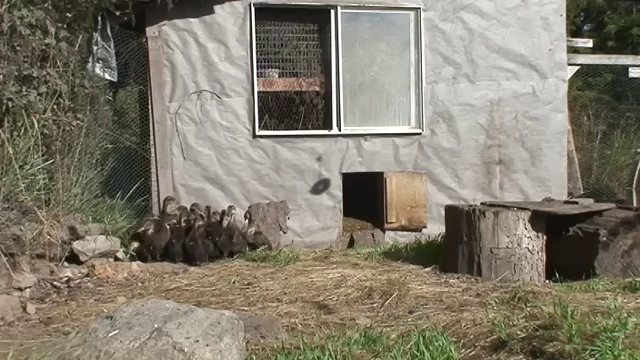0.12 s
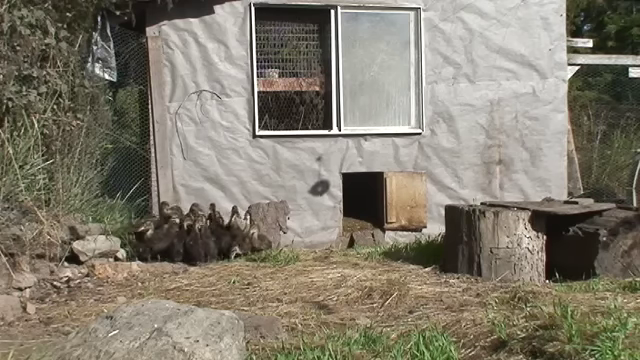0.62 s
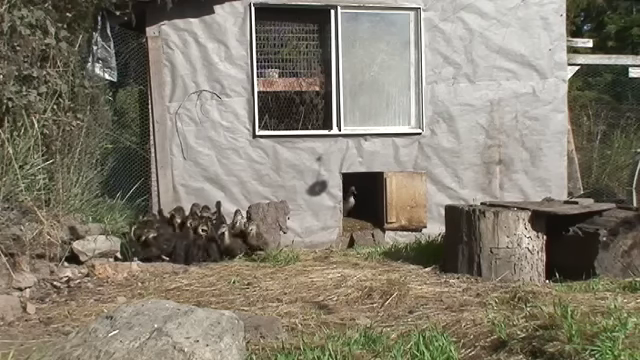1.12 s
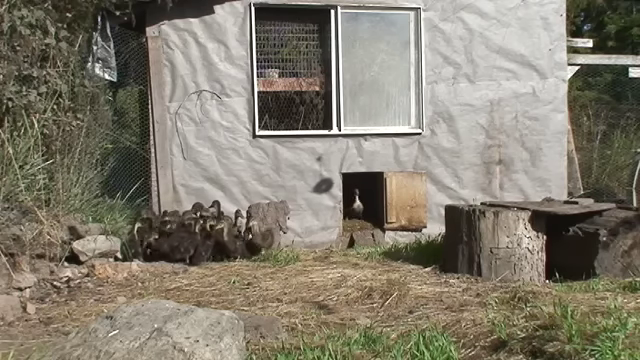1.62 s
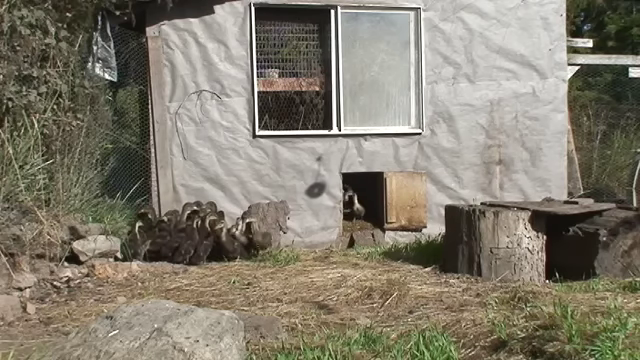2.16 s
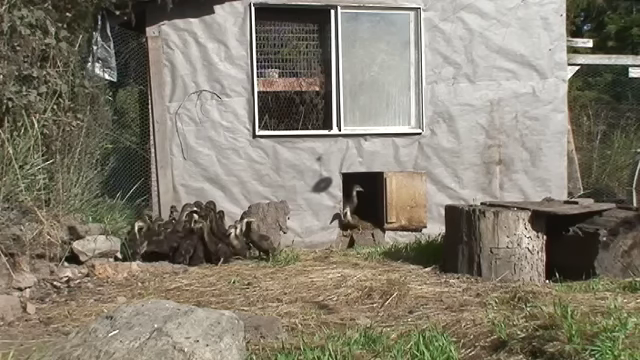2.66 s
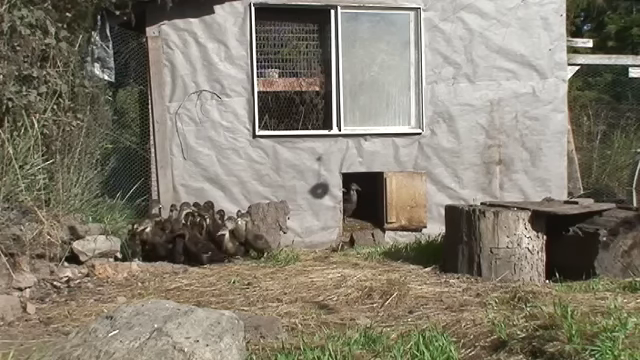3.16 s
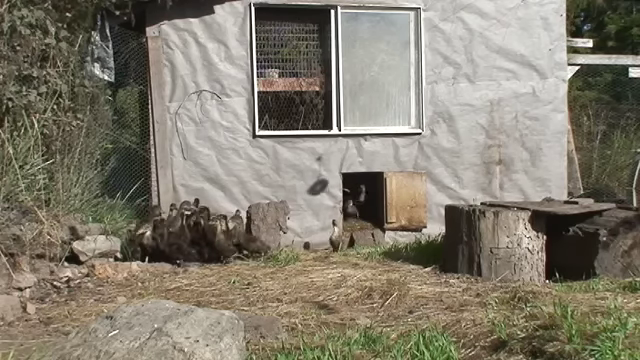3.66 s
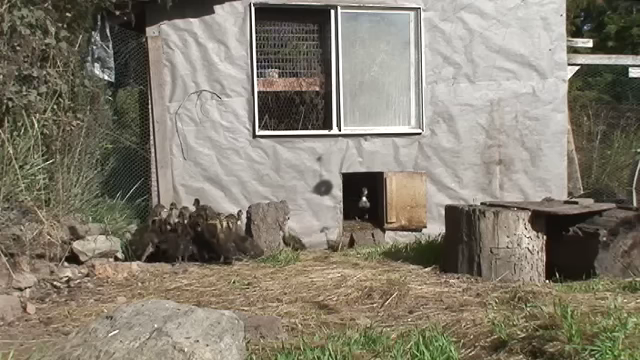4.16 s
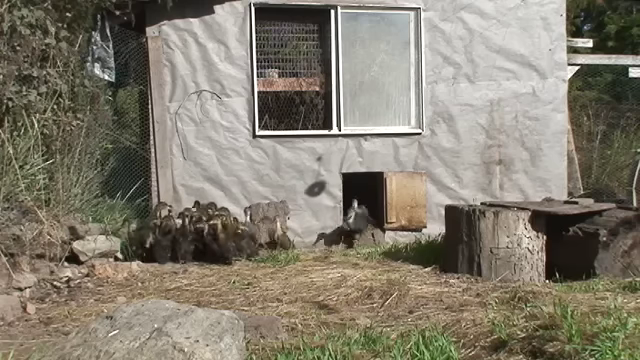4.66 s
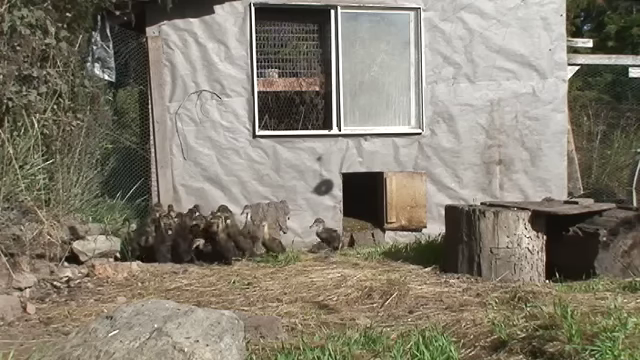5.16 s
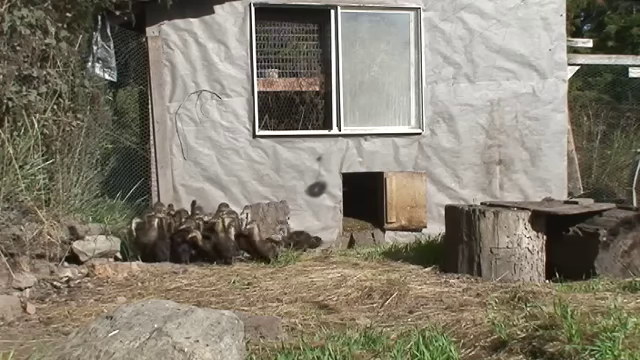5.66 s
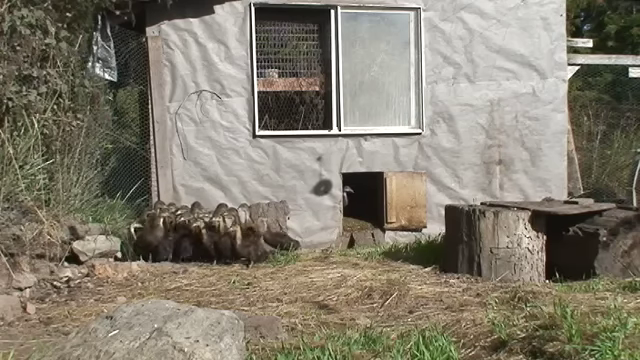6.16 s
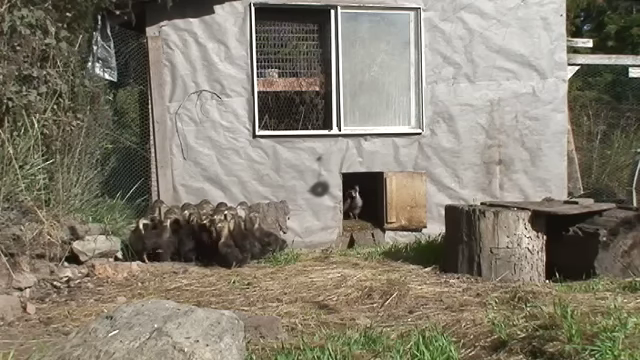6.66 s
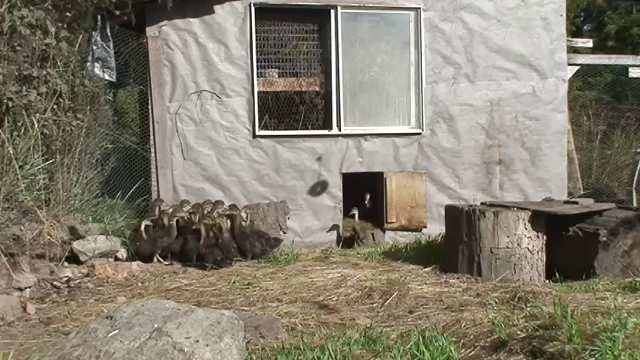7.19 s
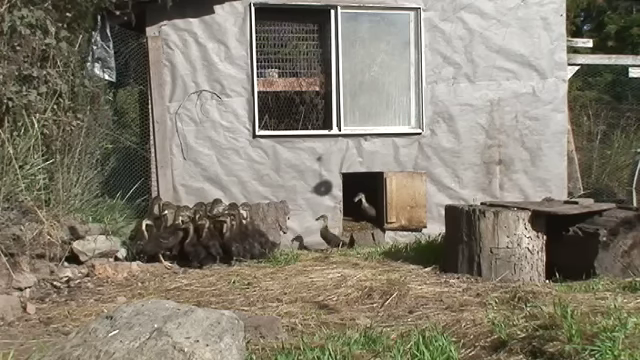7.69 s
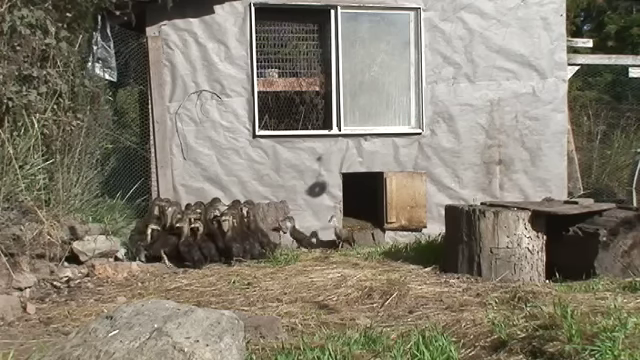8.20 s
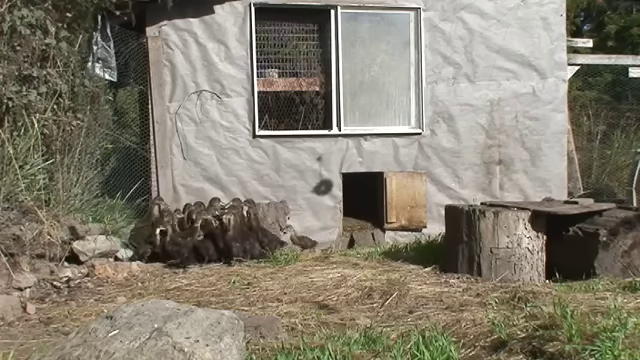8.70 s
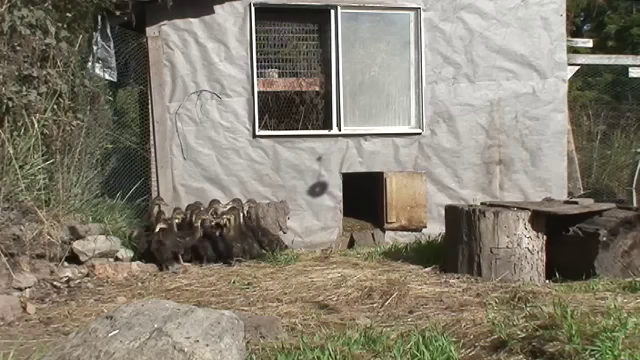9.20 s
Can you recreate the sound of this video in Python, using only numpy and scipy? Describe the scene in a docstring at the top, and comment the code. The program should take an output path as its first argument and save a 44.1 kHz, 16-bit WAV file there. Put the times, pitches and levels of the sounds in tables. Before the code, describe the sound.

For a little over nine seconds, a huddle of ducklings peeps nonstop in an open yard beside a coop. The peeps are thin whistles, mostly under a tenth of a second, gliding or arching around 2 to 3 kHz, irregular and overlapping, with fainter birds behind. Sharper squeaks stand out near 0.9, 1.2 and 4.5 seconds. From about 4.1 to 8.4 seconds, one straggler calls every third of a second in a longer, higher two-toned cheep, faint at first and prominent after 6.5. Dry straw ticks and rustles lightly, including a small shuffle near 2.9. Soft hollow wooden knocks fall around 2.2, 4.2, 5.0 and 8.6, the one at 5.0 short and firmest. Steady distant leaf and traffic hiss lies beneath; low wind buffets the stereo microphone near 3.1 to 3.5, 5.2 and most strongly 6.5 to 7, then 7.9. The wall returns a brief, diffuse reflection.

```python
"""A huddle of ducklings peeps in a yard beside a coop; one straggler calls steadily in a two-toned voice.
Peeps are sines on bowed pitch lines with weak overtones; squeaks are steep arched chirps.
Feet and bills tick and rustle in dry straw (noise), knocked wood rings (decaying sines), the wall answers.
Far outdoor hiss lies under all, and light wind buffets the microphone ports (shaped noise)."""
import sys
import numpy as np
from scipy import signal
from scipy.fft import rfft, irfft, next_fast_len
from scipy.io import wavfile
from scipy.ndimage import uniform_filter1d, map_coordinates

SR = 44100
rng = np.random.default_rng(int(sys.argv[2]) if len(sys.argv) > 2 else 0)


def ratio(d):
    """dB to gain"""
    e = np.asarray(d, float) / 20
    return 10 ** e


def log_audio(samples):
    """Write samples as a 16-bit WAV file to the path given in sys.argv[1]."""
    # one column per channel
    frames = np.atleast_2d(samples).T
    # limit to full scale, then quantise
    limited = np.clip(frames, -1, 1)
    pcm = np.round(limited * 32767).astype(np.int16)
    wavfile.write(sys.argv[1], SR, pcm)


N = 411012


def unit(x):
    """Scale to rms 1."""
    return x / np.sqrt(np.mean(x ** 2) + 1e-20)


def along(points, hz):
    """Read (Hz, value) points on a log frequency axis."""
    f, v = np.transpose(points)
    return np.interp(np.log(hz + 1), np.log(f + 1), v)


def wobble(knots_per_s, size=N):
    """A smooth random curve through normal random knots."""
    knots = rng.standard_normal(size // 50 + 4)
    return map_coordinates(knots, [np.arange(size) * knots_per_s / SR])


def filtered(x, response):
    """Multiply the spectrum of x by a response of frequency."""
    m = next_fast_len(N + SR // 2)
    spectrum = rfft(x, m) * response(np.fft.rfftfreq(m, 1 / SR))
    return irfft(spectrum, m)[..., :N]


def hump(hz, centre_hz, octaves):
    """A bell of gain on a log frequency axis."""
    return np.exp(-.5 * (np.log2((hz + 1) / centre_hz) / octaves) ** 2)


def add(track, start_s, sound, pan_db):
    """Mix a sound into both channels; positive pan leans left."""
    first = round(start_s * SR)
    sound = sound[max(-first, 0):]
    seat = track[:, max(first, 0):][:, :len(sound)]
    seat += ratio([[pan_db / 2], [-pan_db / 2]]) * sound[:seat.shape[1]]


def flutter(size):
    """Gain of an unsteady voice: brief sags and a fast roughness that blurs the line."""
    sags = ratio(-2.6 * wobble(45, size) ** 2)
    return sags * (1 + 0.21 * wobble(420, size))


def edges(length_s, swoop_hz, fall_hz, edge_s):
    """Position, pitch bend and swell of a call: faint swoop in, growth, pitch drop as the breath stops short."""
    stop_s = .016
    t = np.arange(-edge_s, length_s + stop_s, 1 / SR)
    before = np.clip(-t / edge_s, 0, 1)
    after = np.clip((t - length_s) / stop_s, 0, 1)
    grow = 1 - np.exp(-(t + edge_s) / edge_s)
    bend_hz = swoop_hz * before ** 2 - fall_hz * after ** 2
    swell = grow ** 0.7 * (1 - after) ** 0.67
    return np.clip(t / length_s, 0, 1), bend_hz, swell


# overtones of a peep: (multiple of pitch, mean level [dB])
OVERTONES = [(2, -26), (3, -26)]


def peep(track, start, end, first_hz, middle_hz, last_hz, db):
    """A whistle on a bowed pitch line with weak overtones; it hooks up into its first pitch."""
    swoop, fall, pan, *colour = rng.standard_normal(5)
    edge_s = 0.014
    u, bend_hz, swell = edges(end - start, -300 * abs(np.tanh(swoop)), 620 + 150 * fall, edge_s)
    bowed_hz = np.polyval(np.polyfit([0, .5, 1], [first_hz, middle_hz, last_hz], 2), u)
    ragged_hz = (26 + 0.36 * abs(bend_hz)) * wobble(90.0, len(u))  # most at both ends
    phase = 2 * np.pi * np.cumsum(bowed_hz + bend_hz + ragged_hz) / SR
    tone = np.sin(phase)
    for (k, level), c in zip(OVERTONES, colour):
        tone = tone + ratio(level + 2 * c) * flutter(len(u)) ** 2 * swell ** 2 * np.sin(k * phase)
    add(track, start - edge_s, ratio(db + 8.5) * flutter(len(u)) * swell * tone, 1.3 + pan)


# gliding peeps: (start [s], end [s], entry pitch [Hz], exit pitch [Hz], relative level [dB])
GLIDES = [(-0.01, 0.019, 3540, 3050, -44), (0.114, 0.147, 2700, 2595, -49.5),
          (0.542, 0.589, 2290, 2135, -46), (0.391, 0.43, 2447, 2900, -45.5),
          (8.254, 8.369, 2267, 2065, -41.5), (5.363, 5.425, 3680, 3040, -57.5),
          (1.653, 1.742, 2800, 2390, -56), (2.568, 2.611, 2130, 3000, -56.5),
          (0.85, 0.912, 2440, 2174, -44), (0.784, 0.855, 2290, 2026, -54.5), (3.271, 3.35, 2750, 2190, -57),
          (0.94, 0.992, 2130, 2090, -47.5), (1.456, 1.553, 2557, 2545, -43),
          (1.757, 1.856, 2676, 2545, -41.5), (2.083, 2.166, 2633, 2502, -42.5),
          (2.695, 2.768, 2590, 2360, -46.5), (2.97, 3.008, 2440, 2035, -51.5),
          (3.328, 3.409, 2470, 2230, -45.5), (3.331, 3.387, 2720, 2520, -47.5),
          (3.388, 3.43, 2080, 1937, -52), (3.64, 3.701, 2415, 2293, -42), (3.643, 3.709, 2915, 2520, -50.5),
          (3.755, 3.845, 2860, 2080, -52), (3.86, 3.886, 2780, 3230, -46.5),
          (3.834, 3.922, 2705, 2833, -42), (4.6, 4.624, 2885, 2250, -42.5),
          (4.647, 4.693, 2133, 2970, -42.5), (4.828, 4.885, 2640, 2740, -50.5),
          (5.803, 5.874, 2990, 2690, -42.5), (6.458, 6.51, 2077, 1944, -48),
          (6.517, 6.596, 2500, 2466, -48.5), (6.807, 6.892, 2408, 2380, -41),
          (7.052, 7.108, 2475, 2250, -52), (7.086, 7.151, 2695, 2263, -42),
          (7.202, 7.28, 2810, 2450, -48.5), (7.366, 7.435, 2524, 2350, -49),
          (7.654, 7.721, 2370, 1930, -53), (7.77, 7.812, 2150, 1972, -47),
          (7.973, 8.023, 2310, 1980, -43.5), (8.025, 8.069, 2740, 2276, -44.5),
          (8.589, 8.687, 2460, 2202, -45.5), (8.708, 8.751, 2135, 2054, -50.5),
          (8.784, 8.86, 2164, 2016, -48.5), (8.884, 8.928, 2016, 1930, -45.5),
          (8.889, 8.984, 2417, 2274, -41), (8.997, 9.026, 3240, 2617, -45),
          (9.154, 9.221, 2250, 1904, -46.5)]
SAG_HZ, SAG_SHARE = 40, 0.203  # hang under the chord: fixed part, share of the pitch span


def glide(start, end, entry_hz, exit_hz, db):
    """A peep that slides from entry to exit and sags under the straight line between."""
    sag_hz = SAG_HZ + SAG_SHARE * abs(entry_hz - exit_hz)
    return start, end, entry_hz, (entry_hz + exit_hz) / 2 - sag_hz, exit_hz, db


# bowed peeps: (start [s], end [s], middle pitch [Hz], exit pitch [Hz], relative level [dB])
BOWS = [(0.248, 0.347, 3170, 2650, -46), (0.558, 0.667, 2638, 2506, -47.5),
        (0.915, 1.005, 2584, 2527, -43.5), (1.149, 1.24, 2513, 2260, -43.5),
        (1.308, 1.382, 2493, 2450, -44), (1.329, 1.444, 2220, 2140, -55), (2.387, 2.479, 2555, 2413, -45),
        (3.021, 3.084, 2713, 2524, -50), (3.286, 3.318, 3130, 2730, -44.5), (3.526, 3.602, 2430, 2520, -52),
        (3.69, 3.717, 2270, 2012, -43.5), (3.94, 3.964, 2510, 2254, -36.5),
        (3.979, 4.036, 2266, 1990, -45.5), (4.242, 4.331, 2480, 2710, -42.5),
        (4.889, 4.973, 2273, 2730, -45.5), (6.21, 6.318, 2136, 2040, -51.5),
        (6.407, 6.466, 2060, 2130, -48.5), (7.003, 7.04, 2260, 2200, -43), (7.43, 7.463, 2150, 1960, -42),
        (8.365, 8.415, 2530, 2625, -47), (9.021, 9.06, 2650, 2540, -43), (9.175, 9.27, 2306, 2200, -42)]
ARCH_ENTRY, DIP_ENTRY = 0.318, 0.926  # entry pitch, as share of the way from middle to exit


def bow(start, end, middle_hz, exit_hz, db):
    """A peep that arches and falls away, or dips and climbs back."""
    share = ARCH_ENTRY if exit_hz < middle_hz else DIP_ENTRY
    return start, end, middle_hz + share * (exit_hz - middle_hz), middle_hz, exit_hz, db


def huddle():
    """The loud peeps, with faint short ones from birds further back scattered around the calls."""
    track = np.zeros((2, N))
    for row in [*(glide(*g) for g in GLIDES), *(bow(*b) for b in BOWS)]:
        peep(track, *row)
    call_starts = [row[0] for row in [*GLIDES, *BOWS, *STRAGGLER]]
    for who, when, life, pitch, slide, size in rng.random((250, 6)):
        exit_hz = 1850 + 950 * pitch ** 2.5
        other_hz = exit_hz + 900 * (slide - .25)  # entry of a glide, middle of a bow
        start = call_starts[int(who * len(call_starts))] + .7 * (when - .4)
        end = start + 0.0122 + .06 * life ** 2
        shape = glide if pitch * size < who * when else bow
        peep(track, *shape(start, end, other_hz, exit_hz, -65 + 11 * size))
    return track


# quick arched squeaks: (middle [s], length [s], crest pitch [Hz], relative level [dB])
SQUEAKS = [(0.917, 0.073, 3080, -35), (1.988, 0.061, 2170, -43), (4.45, 0.071, 2364, -41),
           (5.23, 0.058, 2445, -42.5), (8.79, 0.053, 3460, -44), (1.166, 0.052, 2780, -39),
           (0.7, 0.065, 3000, -58), (3.81, 0.0395, 3100, -44), (8.962, 0.07, 3500, -52),
           (2.405, 0.05, 3750, -51), (4.795, 0.046, 4500, -49), (0.648, 0.05, 8700, -50.5)]


def squeaks():
    """Steep up-and-down chirps, octave strong near 4540 Hz; fast tremble splits the loudest into stacked lines."""
    track = np.zeros((2, N))
    for middle_s, length_s, crest_hz, db in SQUEAKS:
        u = np.arange(0, 1, 1 / (length_s * SR))
        tremble_phase = 2 * np.pi * 420 * length_s * u + 2.4 * wobble(130, len(u))
        tremble_rad = 1.2 * (db > -39) * np.sin(tremble_phase)
        arch_hz = crest_hz * (1 - .3 * (2 * u - 1) ** 2)
        phase = 2 * np.pi * np.cumsum(arch_hz) / SR + tremble_rad
        octave = ratio(-2.0) * hump(2 * crest_hz, 4540, 0.037) * np.sin(2 * phase)
        swell = np.sqrt(np.sin(np.pi * u))
        chirp = ratio(db) * flutter(len(u)) * swell * (np.sin(phase) + octave)
        add(track, middle_s - length_s / 2, chirp, 1)
    return track


# straggler calls: (start [s], end [s], entry pitch [Hz], dip pitch [Hz], relative level [dB])
STRAGGLER = [(4.135, 4.246, 2935, 2813, -44), (4.461, 4.618, 3030, 2814, -53),
             (4.803, 4.969, 3050, 2770, -53.5), (5.158, 5.301, 3330, 2880, -49.5),
             (5.497, 5.645, 3110, 2860, -50.5), (5.854, 5.999, 3150, 2885, -51.5),
             (6.206, 6.345, 2980, 2890, -49), (6.529, 6.678, 2950, 2880, -42.5),
             (6.889, 7.025, 3070, 3024, -40.5), (7.219, 7.368, 3120, 3032, -37.5),
             (7.575, 7.743, 3030, 2800, -40.5), (7.953, 8.095, 3120, 2966, -38.5),
             (8.311, 8.407, 3330, 2790, -40.5)]
# two tones and their sums: (multiple of low tone, multiple of high tone, relative level [dB])
TWO_TONES = [(1, 0, 3), (0, 1, -14), (2, 0, -25.5), (1, 1, -26.5), (0, 2, -29)]
CLIMB_HZ, CLIMB_HZ_PER_DB, EFFORT_DB = 259, 10, -42  # dip to crest, more in louder calls; middling level


def straggler():
    """Both sides of the voice box sound, about 810 Hz apart; their sums appear as high lines."""
    track = np.zeros((2, N))
    lead_s = .035  # the high tone climbs in this early
    for start, end, first_hz, dip_hz, db in STRAGGLER:
        effort_db = db - EFFORT_DB
        crest_hz = dip_hz + CLIMB_HZ + CLIMB_HZ_PER_DB * effort_db
        # loud calls plunge further
        u, bend_hz, swell = edges(end - start, -900, 900 * ratio(effort_db / 2), lead_s)
        knots_hz = np.interp(u, [0, .28, .78], [first_hz, dip_hz, crest_hz])
        base_hz = uniform_filter1d(knots_hz, SR // 60) + 30 * wobble(103.9, len(u))
        low_hz = base_hz + bend_hz * (u > .5)  # plunges out
        step_hz = 810 + 40 * wobble(41.0, len(u))
        swoop_hz = bend_hz * (u < .5) * (1 + 0.603 * wobble(305, len(u)))  # ragged on its way in
        low = 2 * np.pi * np.cumsum(low_hz) / SR
        high = 2 * np.pi * np.cumsum(base_hz + step_hz + swoop_hz) / SR
        late = uniform_filter1d(1. * (u > 0), SR // 100)  # the low tone joins after the lead
        spent = np.sqrt(1 - u ** 10)  # the high tone gives out first
        voice = 0
        for a, b, level in TWO_TONES:
            gain = ratio(level + (a + b - 1) * effort_db) * flutter(len(u)) ** (a + b)
            voice = voice + gain * late ** a * spent ** (b + a // 2) * np.sin(a * low + b * high)
        swell = np.where(u < .5, np.sqrt(swell), swell)
        add(track, start - lead_s, ratio(db + 8.0) * swell * voice, .3)
    return track


# ticks in the straw: (time [s], relative level [dB])
TICKS = [(0.095, -48.5), (1.521, -51.5), (2.28, -51.5), (3.641, -51), (3.661, -48), (4.317, -50.5),
         (4.627, -49.5), (5.5458, -48), (6.9637, -47.5), (6.401, -51.5), (8.5107, -54)]
# longer rustles in the straw: (middle [s], level before the filter [dB])
RUSTLES = [(2.89, -50.5)]


def straw():
    """Sharp decaying noise ticks, and a bright noise rustle that comes in clumps."""
    track, t = np.zeros((2, N)), np.arange(SR // 25) / SR
    for s, db in TICKS:
        add(track, s, ratio(db + 14.5) * np.exp(-t / 0.0029) * rng.standard_normal(len(t)), .4)
    clumps = ratio(np.minimum(2.5 * wobble(5) + 7 * wobble(70), 16))
    shuffles = sum(ratio(db) * np.exp(-((np.arange(N) / SR - s) / 0.028) ** 2) for s, db in RUSTLES)
    rustle = (ratio(-63.0) * unit(clumps) + shuffles) * rng.standard_normal(N)
    ticks = filtered(track, lambda hz: hump(hz, 4600, 1.2))
    return ticks + filtered(rustle, lambda hz: hump(hz, 10000, 1))


# knocks on hollow wood: (time [s], level before the soft onset [dB], pitch [Hz], t60 [s])
KNOCKS = [(2.229, -40, 148, 0.47), (5.037, -26, 233, 0.059), (8.569, -44, 128, 0.66),
          (4.212, -32.5, 110, 0.08)]


def wood():
    """Each knock rings one hollow low mode that decays exponentially."""
    track, t = np.zeros((2, N)), np.arange(SR // 2) / SR
    for s, db, hz, t60_s in KNOCKS:
        onset = 1 - np.exp(-t / 0.002)
        add(track, s, ratio(db - 60 * t / t60_s) * onset * np.sin(2 * np.pi * hz * t), -.3)
    return track


def wall(x):
    """A short diffuse answer of the coop wall and yard: decaying noise convolved with the mono sum."""
    t = np.arange(SR // 3) / SR
    tail = rng.standard_normal((2, len(t))) * ratio(-60 * t / 0.14) * (t > .004)
    tail += 0.93 * tail[0]  # the answer comes mostly from the front
    return signal.fftconvolve(x.mean(0)[None], tail / np.linalg.norm(tail[0]), axes=1)[:, :N]


# far hiss spectrum: (frequency [Hz], relative level [dB per Hz])
HISS = [(35, -27), (75, 0.5), (830, -4.5), (3890, -17), (11500, -23.5), (12900, -21), (14600, -37)]
# far hiss likeness: (frequency [Hz], left-right correlation [-1 to 1])
ALIKE = [(80, 0.96), (800, 0.02), (3000, 0.43)]


def hiss():
    """Far leaves and traffic: smooth noise, least alike left and right in the middle range."""
    def mid_side(hz):
        turn_rad = np.arccos(np.clip(along(ALIKE, hz), -1, 1)) / 2
        return ratio(along(HISS, hz)) * [np.cos(turn_rad), np.sin(turn_rad)]

    mid, side = filtered(rng.standard_normal((2, N)), mid_side)
    return ratio(-51 + 1.4 * wobble(2.067)) * unit(np.array([mid + side, mid - side]))


# gusts on the ports: (middle [s], relative level [dB])
GUSTS = [(3.1, -50), (3.451, -49.5), (5.23, -50.5), (6.5, -44), (6.94, -42), (7.87, -48)]


def wind():
    """Low turbulence in gusts over a rising breeze, partly unlike per port, stronger right; a faint drone."""
    t = np.arange(N) / SR
    breeze = ratio(-68 + 1.1 * t + 3 * wobble(4.8))
    blow = breeze + sum(ratio(db) * np.exp(-((t - s) / 0.09) ** 2) for s, db in GUSTS)
    shared, left, right = [ratio(4.6 * wobble(20)) * rng.standard_normal(N) for _ in range(3)]
    ports = shared + 0.9 * np.array([left, right])
    lumps = filtered(ports, lambda hz: hump(hz, 35.6, 0.96) + 0.06 * hump(hz, 290, 0.92))
    drone_level = ratio(-63.0 + 2.8 * wobble(2.96))
    drone = drone_level * np.sin(2 * np.pi * np.cumsum(89 + 4 * wobble(4.9)) / SR)
    return blow * ratio([[-2.5], [2.5]]) * unit(lumps) + drone


def scene():
    """Birds, straw and wood in front of the wall, in hiss and wind."""
    near = huddle() + squeaks() + straggler() + straw() + wood()
    return near + ratio(-8) * wall(near) + hiss() + wind()


def band_limit(x):
    """A steep low-pass at the top of the band."""
    return signal.sosfilt(signal.butter(12, 15080, fs=SR, output="sos"), x)


GAP_HZ, GAP_WIDTH_HZ, TOP_HZ = 11640, 400, 14650


def record(dry):
    """A narrow gap in the treble, nearly mono above it, nothing over the band limit."""
    mid_side = np.array([dry[0] + dry[1], dry[0] - dry[1]]) / 2
    mid, side = filtered(mid_side, lambda hz: (abs(hz - GAP_HZ) > GAP_WIDTH_HZ / 2) & (hz < TOP_HZ))
    side = filtered(side, lambda hz: np.where(hz < GAP_HZ, 1, .15))
    return band_limit(np.array([mid + side, mid - side]))


dry = scene()
out = record(dry)
log_audio(out)
```